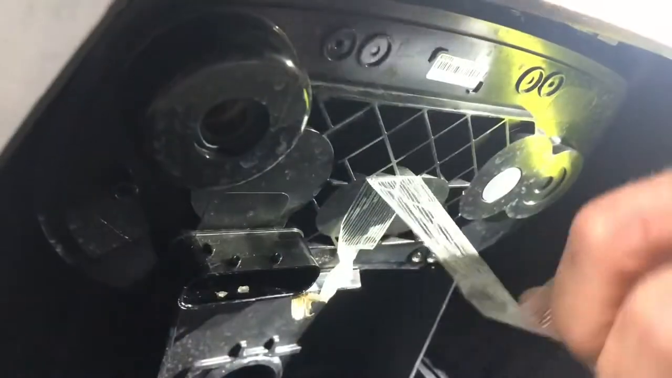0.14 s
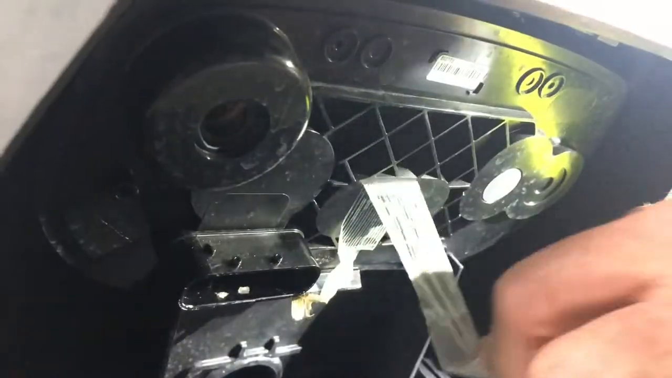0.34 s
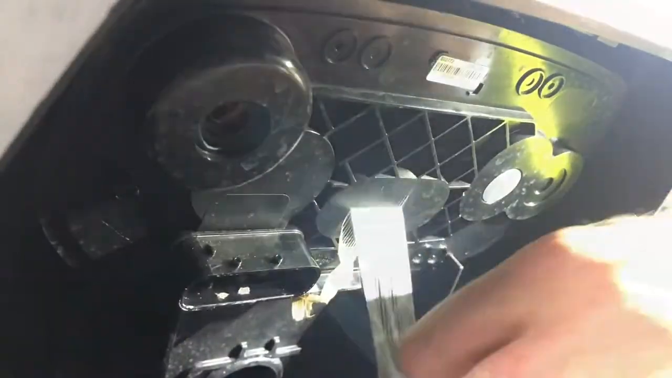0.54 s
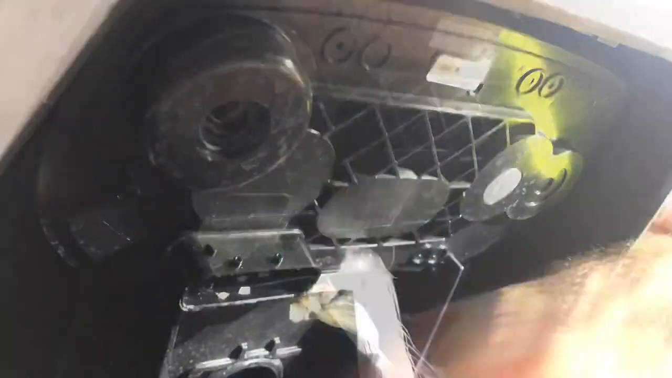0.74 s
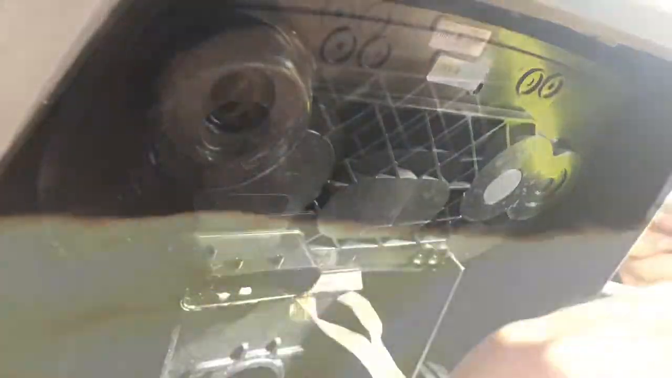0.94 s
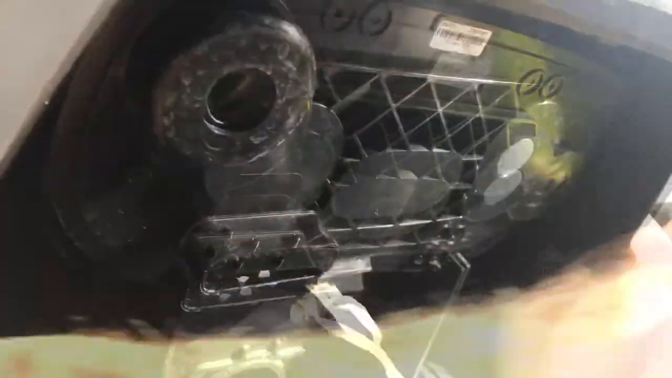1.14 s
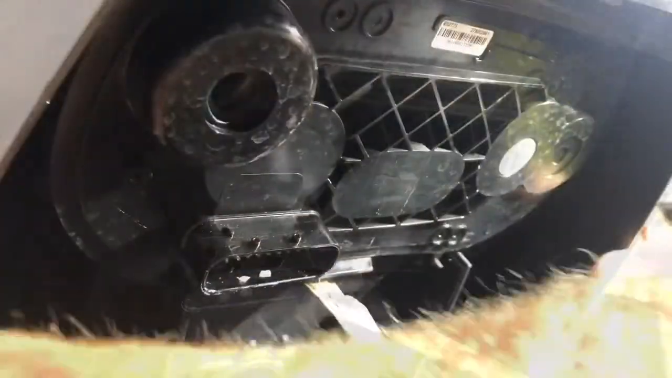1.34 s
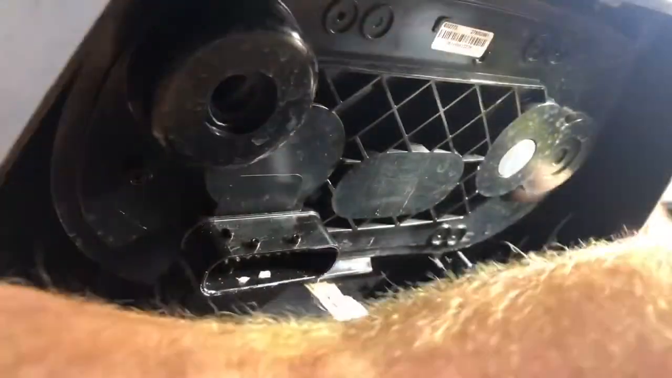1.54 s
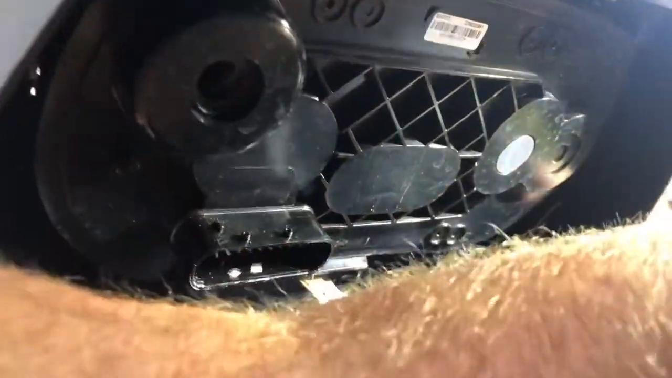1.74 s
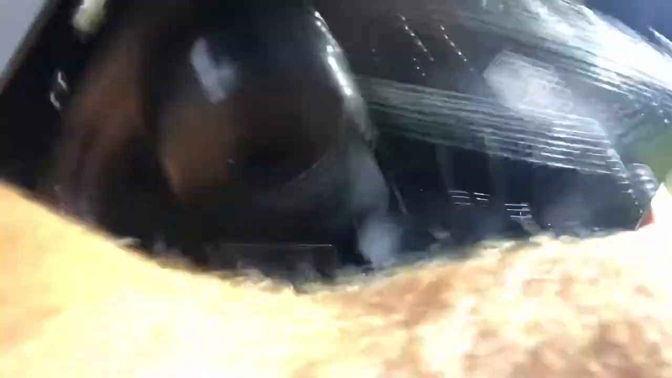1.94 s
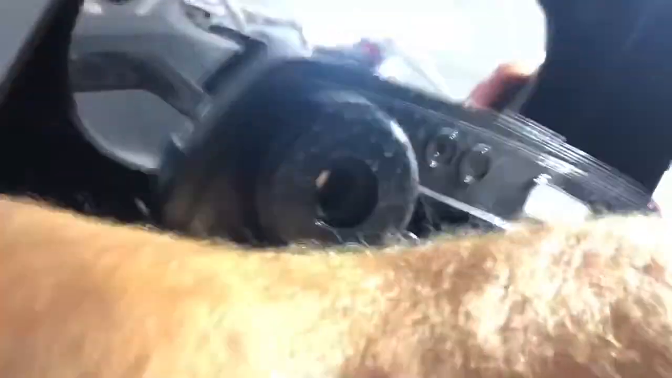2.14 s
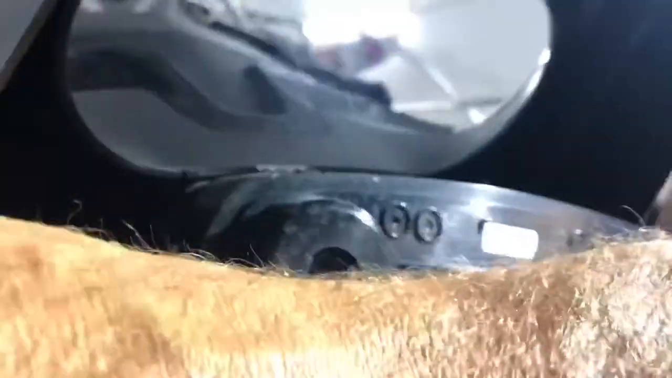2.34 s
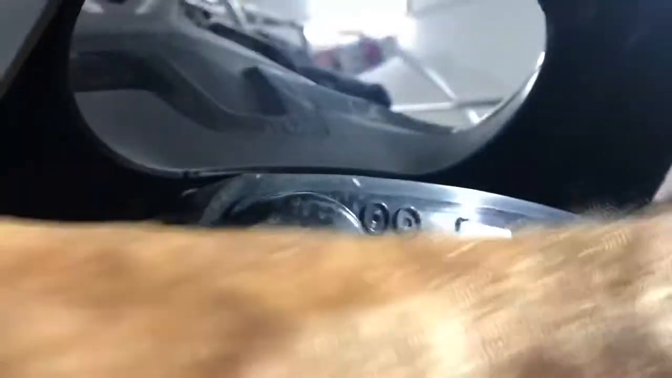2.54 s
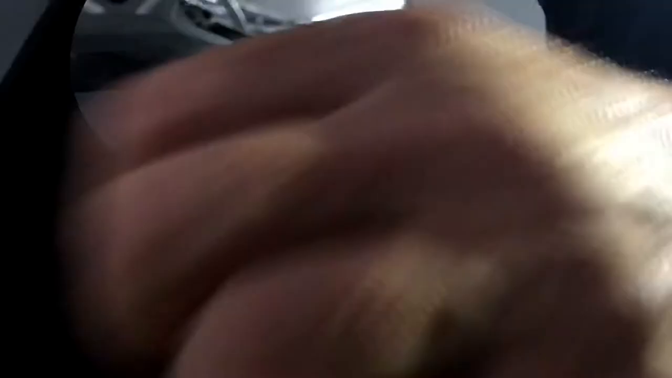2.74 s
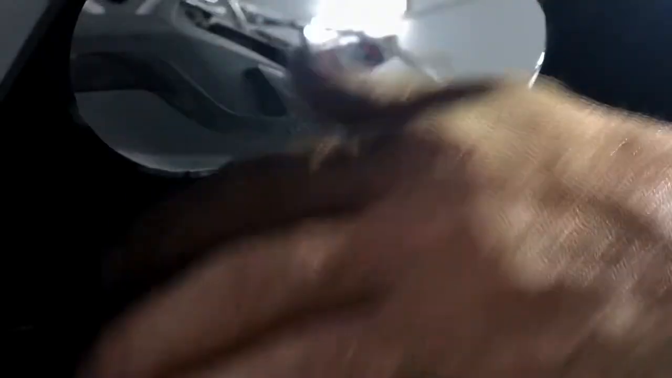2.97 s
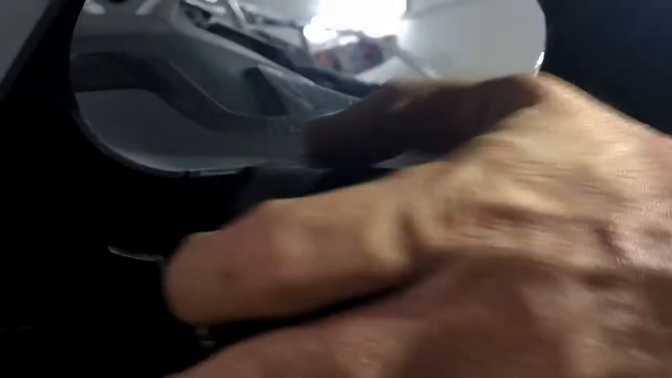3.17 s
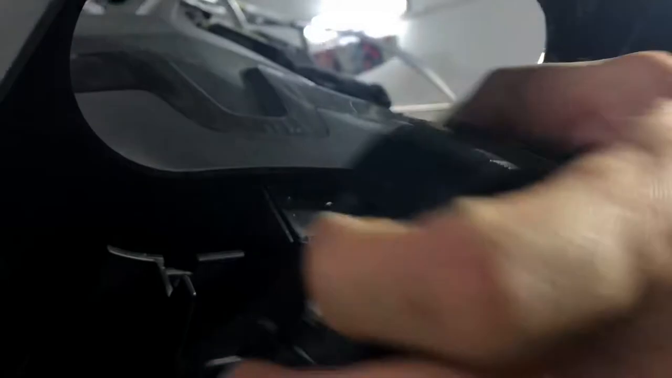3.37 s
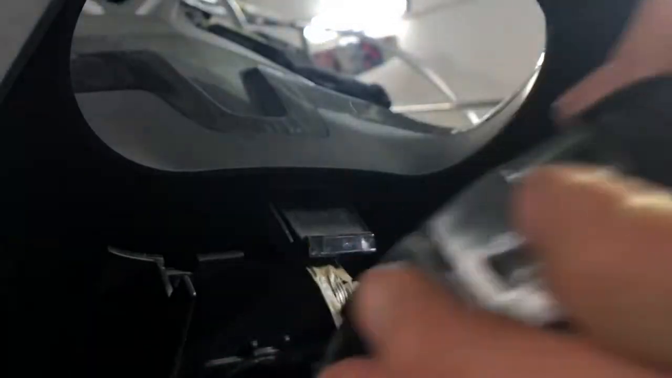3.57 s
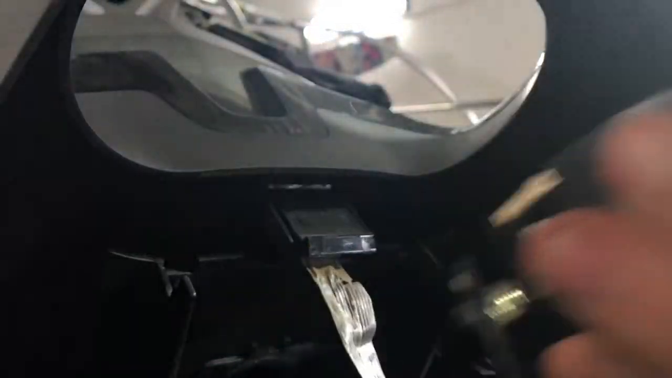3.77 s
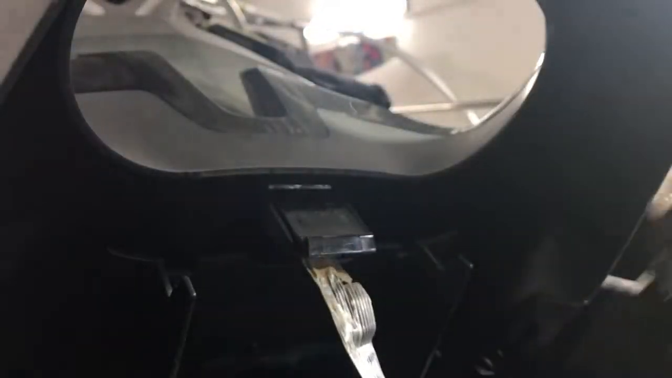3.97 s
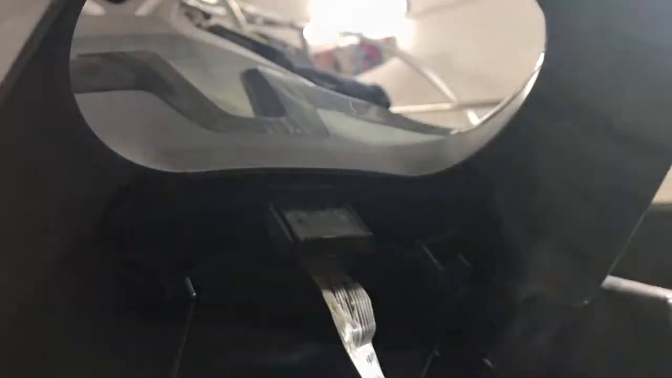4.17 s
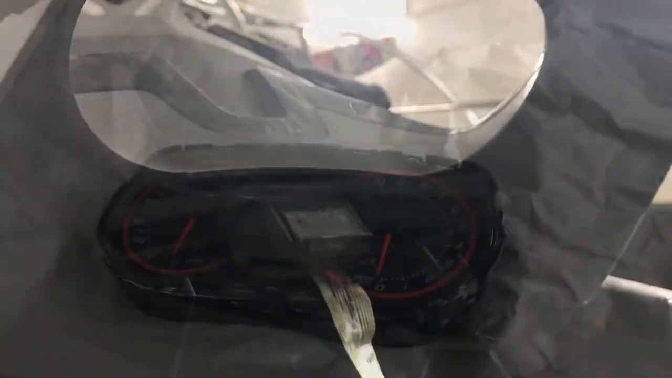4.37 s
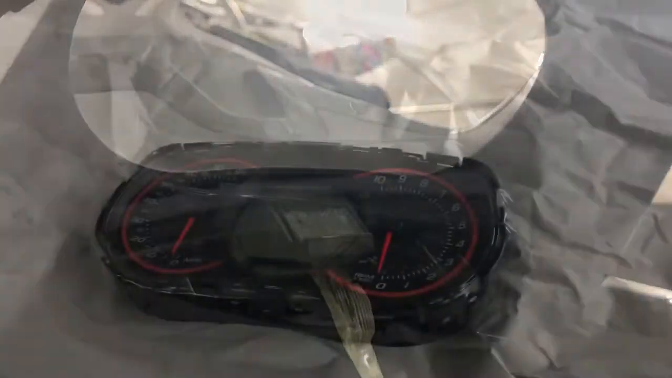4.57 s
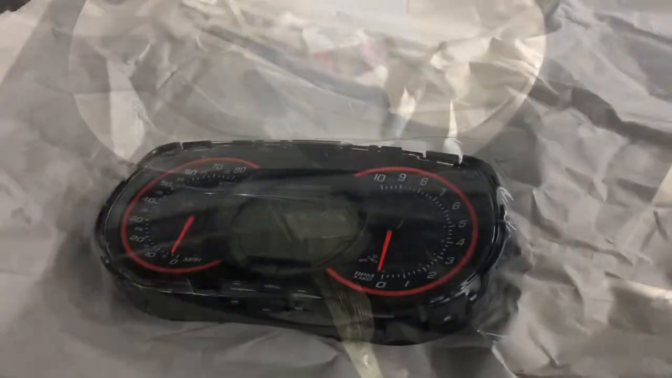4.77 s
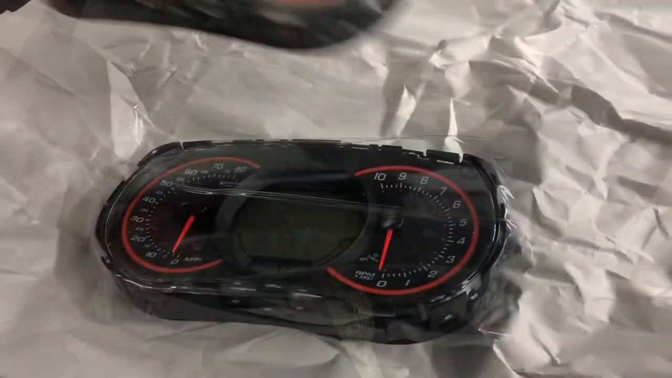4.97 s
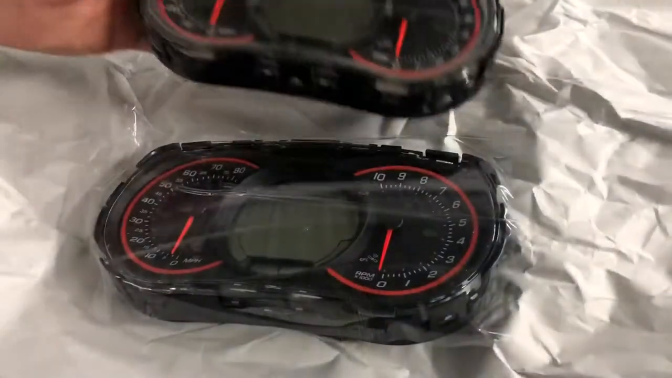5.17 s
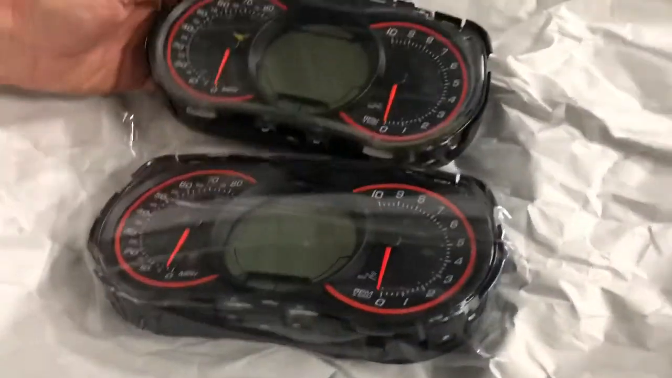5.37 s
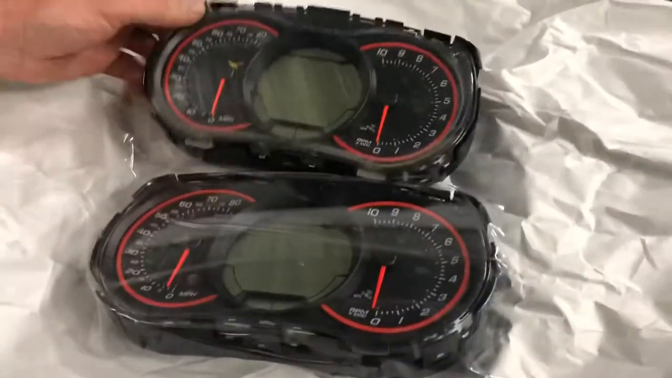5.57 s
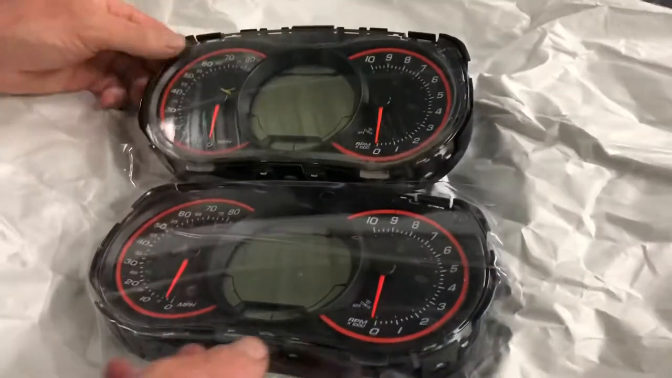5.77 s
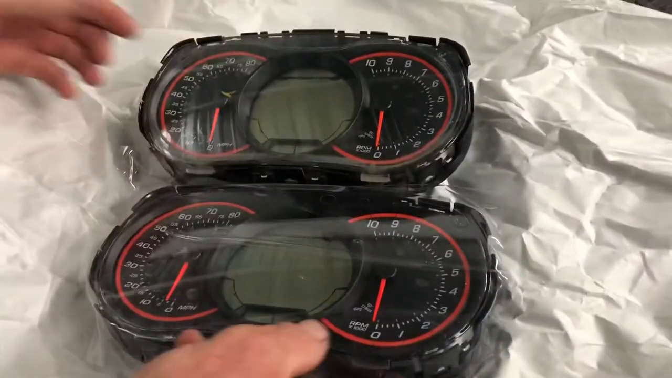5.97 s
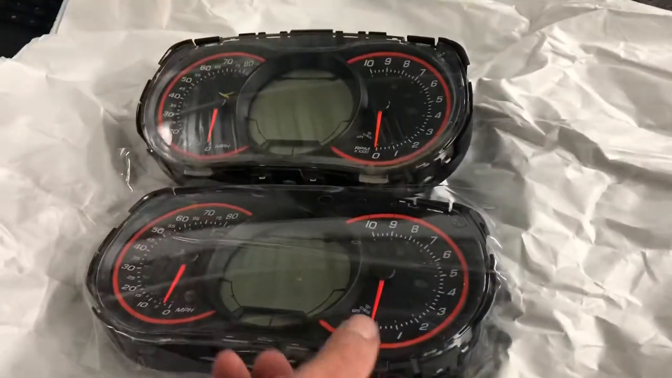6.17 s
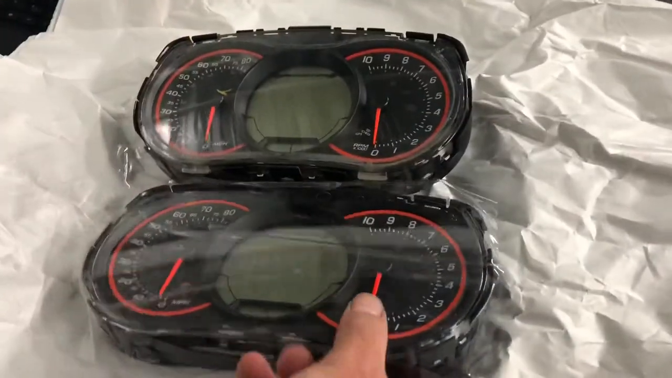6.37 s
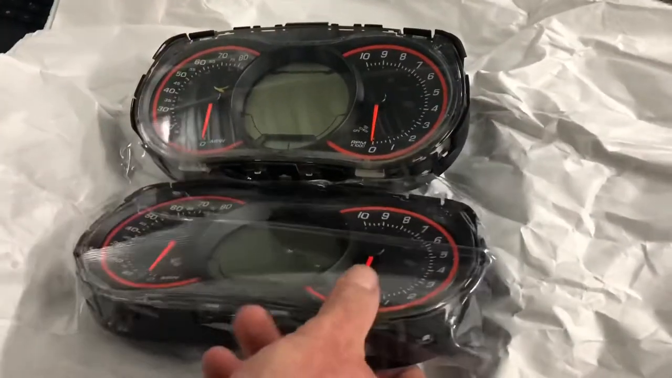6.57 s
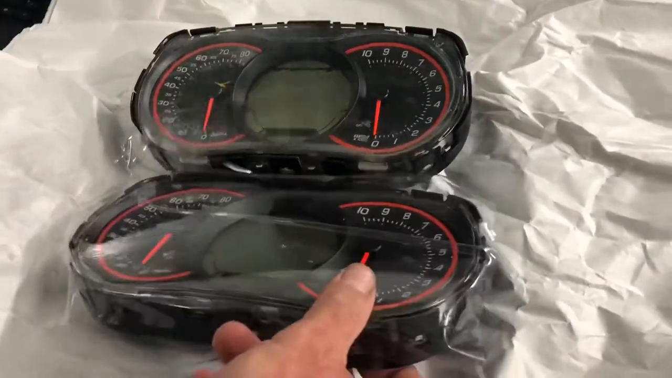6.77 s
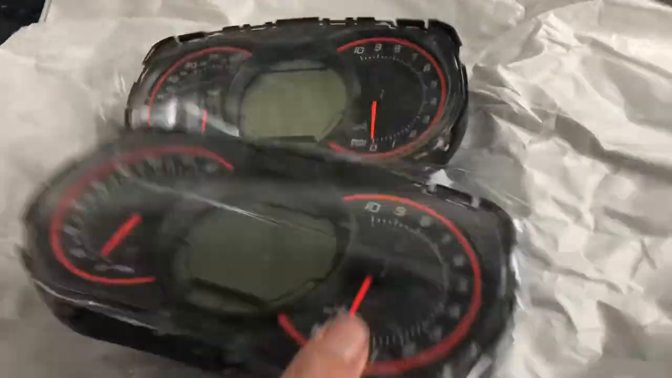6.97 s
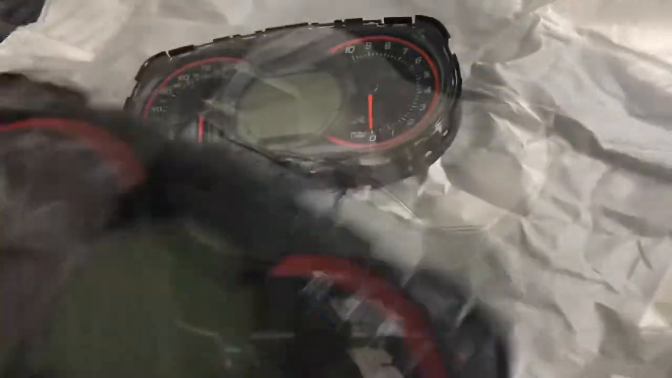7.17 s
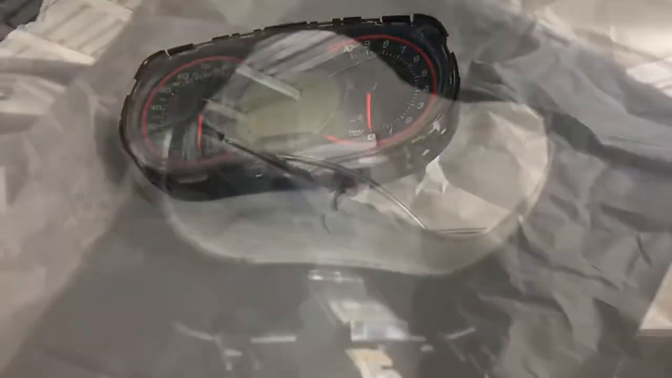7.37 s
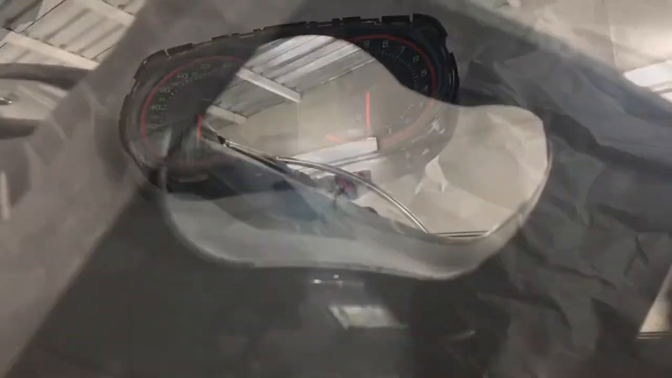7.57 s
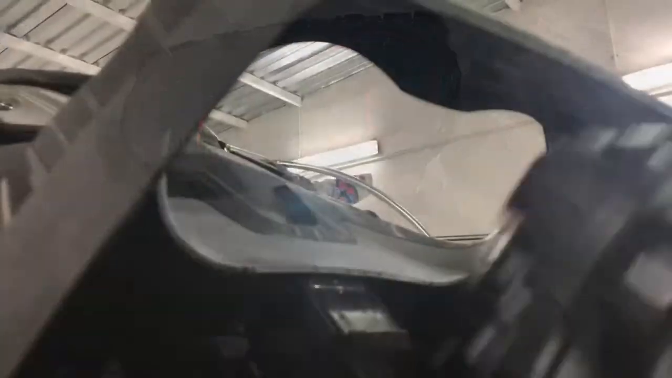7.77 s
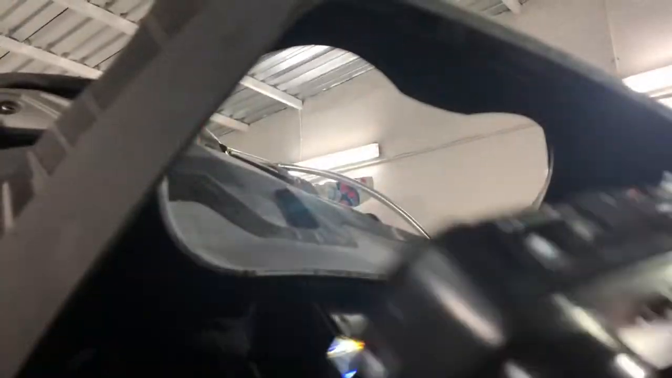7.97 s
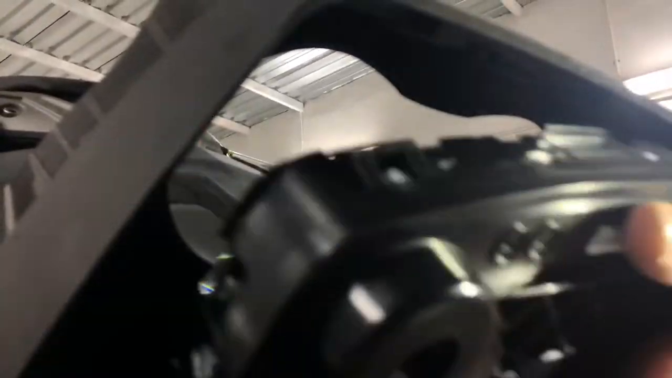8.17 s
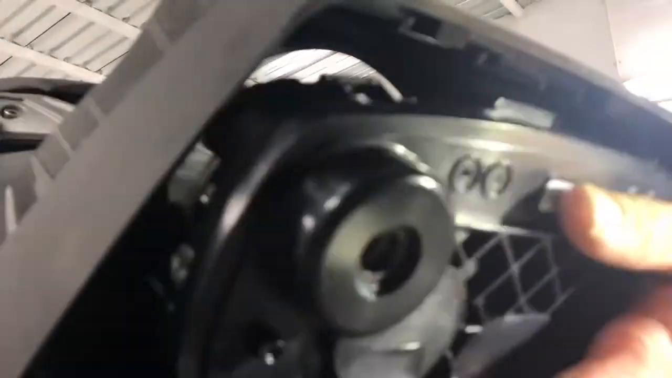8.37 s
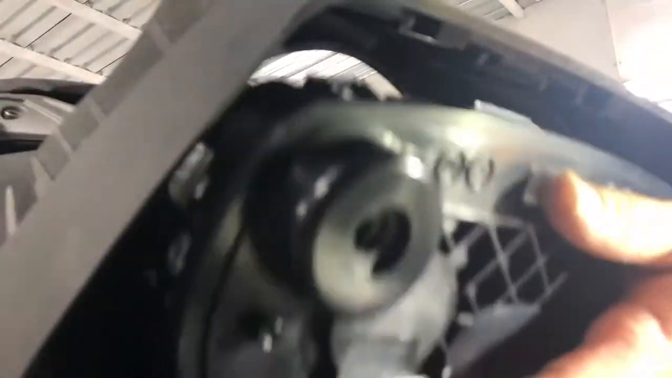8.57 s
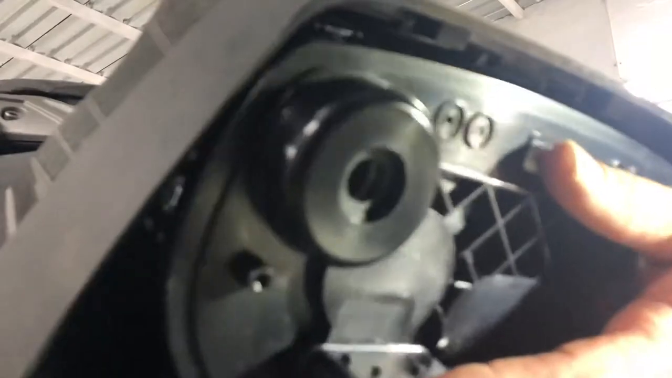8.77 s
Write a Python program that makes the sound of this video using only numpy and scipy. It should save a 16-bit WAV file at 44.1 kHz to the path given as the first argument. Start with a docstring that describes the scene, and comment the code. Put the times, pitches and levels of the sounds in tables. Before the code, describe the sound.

A soft sliding hiss of a wire ribbon and a few light clicks lead into a burst of hard plastic knocks and snaps, the hollow panel thumping and rattling as the gauge housing comes free. Hands rub and scrape the parts, then pause. Paper crinkles in small snaps as a housing is laid down and another lifted, and faint plastic taps finish. The microphone is close, in a still workshop.

```python
"""A ribbon hisses out of its socket, close to a small microphone in a quiet workshop.
Hands work a plastic gauge housing out of a hollow dash panel: knocks and clip snaps ring the housing,
the panel booms and shudders, and sliding contact rubs the same parts. The housing is laid on crumpled
paper, which buckles in small snaps, and another is lifted. Still air and dull reflections lie behind."""
import sys
import numpy as np
from scipy import signal
from scipy.fft import rfft, irfft, next_fast_len
from scipy.io import wavfile
from scipy.ndimage import uniform_filter1d

SR = 44100
rng = np.random.default_rng(int(sys.argv[2]) if len(sys.argv) > 2 else 0)


def pcm_store(signal):
    """Save signal as 16-bit PCM."""
    levels = np.round(np.clip(np.atleast_2d(signal), -1, 1) * 32767)
    wavfile.write(sys.argv[1], SR, levels.astype(np.int16).T)


N = 388962

# The ribbon's pull: time_s, level_db
RIBBON_PULL = [(0, -115), (.07, -49.5), (0.192, -52), (0.214, -36.5), (.26, -74), (0.33, -53),
               (0.433, -33.5), (.5, -51), (.6, -40), (0.691, -49), (0.73, -23.5), (0.751, -69)]
# Hiss of the sliding ribbon: freq_hz, gain_db
RIBBON_SPECTRUM = [(500, -5.5), (2000, -40), (4000, -2.5), (7000, 4), (16000, -4.5)]
# Resonances of its hollow socket: pitch_hz, gain_db
SOCKET_MODES = [(522, -0.5), (834, -0.5), (1600, -4), (2570, -6), (3070, -6.5), (3620, -8.5), (5010, -6.5),
                (6260, -4), (6650, -5.5), (7600, -8), (8580, -5.5), (9810, -5.5)]
# Still workshop air: freq_hz, gain_db
AIR_SPECTRUM = [(18, -51), (30, -16), (90, -2), (394, -12), (1130, -22.5), (16000, -43.5)]
# Hands and parts sliding: time_s, scrape_db, hiss_db
SLIDING = [(0, -56.5, -57), (.7, -55.5, -43), (.86, -57, -61), (1.2, -50, -55), (1.7, -48, -60.5),
           (2.1, -41, -49), (2.35, -63, -92), (2.55, -63, -51.5), (3.047, -56, -71), (3.201, -44.5, -54.5),
           (3.9, -52, -64.5), (4.2, -69, -70.5), (5.228, -71.5, -78), (5.45, -46, -46), (5.9, -50.5, -50),
           (6.18, -59.5, -55), (6.5, -49.5, -53.5), (7.05, -59.5, -59.5), (7.299, -63.5, -68),
           (8, -63.5, -61), (8.349, -66.5, -68), (8.82, -65.5, -68)]
# Scrape of the rubbed housing: freq_hz, gain_db
SCRAPE_SPECTRUM = [(250, -1), (500, 3), (1300, -5.5), (3000, -15.5), (5000, -36)]
# Hiss at the rubbed surface: freq_hz, gain_db
HISS_SPECTRUM = [(1500, -18.5), (3000, 0.5), (5000, 3), (8000, -2), (16000, -5)]
# Modes of the dash panel: pitch_hz, gain_db, t60_s
PANEL_MODES = [(102, 1.5, 0.023), (133, -5, 0.12), (176, -4, 0.14), (201.3, 2.5, 0.14), (271.5, -5.5, 0.19)]
# Blows and clip snaps: start_s, housing_db, panel_db (before the swing limit), tick_db, pitch_hz
KNOCKS = [(0.205, -31, -68, -35, 1080), (0.314, -36.5, -39, -45, 454), (0.729, -20, -36.5, -18, 700),
          (1.047, -23.5, -47, -30, 756), (1.407, -18, -43, -28, 800), (1.585, -22.5, -57, -69.5, 492),
          (1.747, -2.5, -29, -11.5, 730), (1.784, -6, -22, -12.5, 490), (1.864, -12.5, -20, -21, 625),
          (1.929, -8.5, -18, -33, 595), (2.045, 0, 3, -1.5, 567), (2.161, -4, -9, -8, 505),
          (2.222, -9.5, -14, -18.5, 510), (2.264, -20.5, -24, -35, 485), (2.3, -47, -17.5, -21.5, 536),
          (2.366, -14.5, -47, -31.5, 487), (3.142, -10, -20.5, -19.5, 390),
          (5.261, -10.5, -24.5, -33.5, 537), (5.629, -9.5, -31, -27, 970), (7.036, -18, -39, -32, 1030),
          (8.083, -33, -57, -32.5, 547), (8.532, -30, -58, -32.5, 847), (8.699, -35.5, -35.5, -39, 605)]
# Ring time of the housing's packed modes: freq_hz, t60_s
HOUSING_DECAY = [(250, 0.086), (600, 0.034), (1500, 0.06), (4000, 0.0097)]
# Tick of a hard contact: freq_hz, gain_db
TICK_SPECTRUM = [(1500, 0.5), (3000, 0), (5000, -0.5), (8000, -10), (16000, -20)]
# Hollows that answer a blow with one clear note: start_s, peak_db, pitch_hz
HOLLOW_NOTES = [(0.727, -19, 521), (3.143, -11, 318.6), (7.04, -25, 1136), (8.085, -29.5, 562)]
# Brief rubs, and low thumps that follow some blows: start_s, length_s, level_db, centre_hz, width_octaves
SCUFFS = [(0.759, 0.039, -36.5, 201, 0.88), (1.113, 0.067, -39.5, 660, 1.2), (1.615, 0.074, -36, 335, 0.16),
          (1.886, 0.021, -30, 4950, 1.2), (2.514, 0.35, -46.5, 11100, 1.85),
          (3.416, 0.092, -46.5, 6950, 0.69), (3.449, 0.065, -36.5, 480, 0.56),
          (4.009, 0.026, -58, 7530, 0.34), (5.238, 0.068, -45, 2560, 2), (6.211, 0.11, -47.5, 2760, 1.24),
          (6.905, 0.079, -42.5, 1800, 1.3), (7.02, 0.21, -49.5, 96, 0.62), (7.03, 0.26, -56.5, 860, 0.35),
          (7.596, 0.13, -59, 1590, 1.3), (7.754, 0.091, -56, 2586, 0.17), (7.86, 0.13, -69.5, 7260, 0.12),
          (8.111, 0.1, -59, 2580, 1.44), (8.702, 0.19, -42.5, 204, 1.23), (8.723, 0.073, -50.5, 2690, 0.44)]
# Thin clips and creases flicking free: start_s, peak_db, pitch_hz
FLICKS = [(1.258, -35.5, 3500), (1.286, -41, 2480), (1.987, -28, 6340), (2.109, -22, 7600),
          (3.081, -31.5, 3000), (3.252, -20.5, 4340), (3.349, -44.5, 2800), (3.437, -23, 3500),
          (3.569, -32, 3340), (5.683, -14.5, 5400), (7.147, -42.5, 3040), (8.769, -30, 5940)]
# Chattering drags: start_s, length_s, level_db, centre_hz, width_octaves, slips_per_s, drag_ratio
CHATTER = [(3.654, 0.286, -44, 447, 0.51, 205, 0.3), (4.056, 0.11, -55, 1720, 0.98, 575, 0.8)]
# Paper buckling under the housing: start_s, body_db, tick_db, pitch_hz
PAPER_SNAPS = [(5.284, -29, -25, 2500), (5.417, -20.5, -22.5, 1440), (5.502, -29, -26, 2800),
               (5.56, -14.5, -25.5, 1330), (5.604, -45, -24.5, 1220), (5.646, -31, -26, 1500),
               (5.764, -28, -26.5, 1430), (5.778, -28.5, -49, 606), (5.854, -26, -68, 710),
               (5.944, -24.5, -26.5, 1220), (5.979, -26, -23, 776), (5.993, -29, -16.5, 1143),
               (6.038, -25, -32, 1850), (6.059, -19.5, -23, 1290), (6.172, -27, -27, 1340),
               (6.318, -22.5, -66, 1085), (6.47, -27, -22, 1240), (6.485, -20, -23.5, 2960),
               (6.578, -32, -36, 1784), (6.597, -30, -32.5, 1498), (6.656, -27, -42, 1090),
               (6.673, -19.5, -22.5, 1780), (6.72, -26, -34, 2000), (6.823, -21.5, -25.5, 2490),
               (6.845, -35, -26, 1370), (6.943, -37, -26.5, 2200), (7.013, -24, -30.5, 1250)]

PAPER_START_S, PAPER_END_S = PAPER_SNAPS[0][0], PAPER_SNAPS[-1][0]
SWING_LIMIT_DB = -4  # the mounts bound how far the panel swings
RIDGES_DB, RIDGE_COUNT = 4.0, 70  # small hollows in the parts lift some bands and sink others
CONTACT_DRAWS = 2500  # random numbers that give one contact its character


def amp(db):
    return 10 ** (np.asarray(db) / 20)


def unit_rms(x):
    return x / np.sqrt(np.mean(x ** 2) + 1e-20)


def peaked(x, db):
    return amp(db) * x / abs(x).max()


def add(mix, start_s, sound):
    part = mix[round(start_s * SR):][:len(sound)]
    part += sound[:len(part)]


def coloured(x, spectrum):
    """Shapes x by a spectrum of freq_hz, gain_db points."""
    hz, db = np.transpose(spectrum)
    size = next_fast_len(len(x))
    gain_db = np.interp(np.log(np.fft.rfftfreq(size, 1 / SR) + 1), np.log(hz), db)
    return irfft(rfft(x, size) * amp(gain_db), size)[:len(x)]


def ridged(spectrum, ridges=None):
    """A spectrum with ridges laid over it, random unless given."""
    if ridges is None:
        ridges = rng.standard_normal(RIDGE_COUNT)
    hz, db = np.transpose(spectrum)
    grid_hz = np.geomspace(hz[0], hz[-1], len(ridges))
    return np.c_[grid_hz, np.interp(np.log(grid_hz), np.log(hz), db) + RIDGES_DB * ridges]


def ring(modes, tilt_db=0, damping=1, seconds=.5, signs=1):
    """Impulse response of a set of modes, each raised or lowered by tilt_db."""
    hz, db, t60 = np.transpose(modes)[:, :, None]
    t = np.arange(round(seconds * SR)) / SR
    decay = amp(db + np.reshape(tilt_db, (-1, 1)) - 60 * damping * t / t60)
    return (np.reshape(signs, (-1, 1)) * decay * np.sin(2 * np.pi * hz * t)).sum(0)


def grit(per_s, spread_db, drag):
    """Stick-slip force: sparse slips of uneven size over an even drag."""
    sizes = amp(spread_db * np.minimum(rng.exponential(1, N), 5))
    slips = sizes * (rng.random(N) < per_s / SR) * rng.standard_normal(N)
    return unit_rms(slips) + drag * rng.standard_normal(N)


def flicker(seconds, db):
    """Gain that wavers with the pressure of a sliding contact."""
    width = round(seconds * SR)
    drift = uniform_filter1d(uniform_filter1d(rng.standard_normal(N), width), width)
    return amp(db * unit_rms(drift))


def resonate(x, hz, stage_width_hz):
    """Two like resonators in series."""
    radius = np.exp(-np.pi * stage_width_hz / SR)
    for _ in range(2):
        x = 2 * signal.lfilter([1 - radius], [1, -radius * np.exp(2j * np.pi * hz / SR)], x).real
    return x


def wandering(force, spectrum):
    """The ridges change as the contact wanders: four colourings take turns."""
    shares = np.array([flicker(.12, 9) for _ in range(4)])
    tints = np.array([unit_rms(coloured(force, ridged(spectrum))) for _ in shares])
    return unit_rms((shares * tints).sum(0) / np.linalg.norm(shares, axis=0))


def ribbon():
    """Fine friction hiss, part of it coloured by the hollow socket."""
    time_s, db = np.transpose(RIBBON_PULL)
    drag = grit(680, 2.2, 0.93)
    socket = sum(amp(gain_db) * flicker(0.078, 4.0) * unit_rms(resonate(drag, hz, stage_width_hz=190))
                 for hz, gain_db in SOCKET_MODES)
    level = amp(np.interp(np.arange(N) / SR, time_s, db, right=-120)) * flicker(0.012, 0.79)
    hiss = unit_rms(coloured(drag, ridged(RIBBON_SPECTRUM)))
    return level * (hiss + amp(1.0) * unit_rms(socket))


def workshop_air(level_db=-69.5):
    """Room tone: low, steady noise behind the hands."""
    return amp(level_db) * unit_rms(coloured(rng.standard_normal(N), AIR_SPECTRUM))


def rubbing():
    """Friction drives panel, housing and surface hiss; shuddering parts add rattle and small clicks."""
    time_s, *levels = np.transpose(SLIDING)
    t = np.arange(N) / SR
    scrape_level, hiss_level = (amp(np.interp(t, time_s, db)) for db in levels)
    shaking = shudder()
    panel = signal.oaconvolve(grit(130, 2.5, 4.5), ring(PANEL_MODES, damping=1.5))[:N]
    drag = flicker(.03, 1.7) * grit(500, 2.0, 3.0)
    creases = flicker(0.025, 3.2) * grit(700, 2.2, 1.6)  # on paper the friction comes in clumps
    force = np.where((t > PAPER_START_S) & (t < PAPER_END_S), unit_rms(creases), unit_rms(drag))
    rumble = np.hypot(amp(-4.5) * scrape_level, shaking) * unit_rms(panel)
    scrape = np.hypot(scrape_level, amp(-9) * shaking) * wandering(force, SCRAPE_SPECTRUM)
    clatter = amp(-27.5) * shaking * wandering(grit(200, 3.4, 0.66), TICK_SPECTRUM)
    hiss = hiss_level * wandering(force * flicker(0.059, 1.3), HISS_SPECTRUM)
    return rumble + scrape + clatter + hiss


def knock(housing_db, panel_db, tick_db, hz):
    """The housing clacks, and the heavy panel takes several milliseconds to boom."""
    chance, count = rng.standard_normal(CONTACT_DRAWS), len(PANEL_MODES)
    boom = ring(PANEL_MODES, 3.7 * chance[1248:][:count], signs=(-1) ** np.arange(count))
    out = peaked(signal.fftconvolve(boom, np.hanning(150)), min(panel_db, SWING_LIMIT_DB))
    add(out, 0, clack(housing_db, tick_db, hz, chance=chance))
    return out


def clack(body_db, tick_db, hz, damping=1, contact_s=0.001, bright_db=0, chance=None):
    """A brief rattling contact ticks and rings the housing's modes around the struck spot's pitch."""
    if chance is None:
        chance = rng.standard_normal(CONTACT_DRAWS)
    rattle, detune, spot, noise = chance[:1200], chance[1200:1248], chance[1250:1298], chance[1300:]
    mode_hz = np.geomspace(230, 4000, 48) * (1 + .02 * detune)
    t60 = np.exp(np.interp(np.log(mode_hz), *np.log(HOUSING_DECAY).T))
    octaves = np.log2(mode_hz / hz)
    mode_db = -np.where(octaves > 0, 7.0, 11.0) * abs(octaves) - 0.96 * np.maximum(octaves, 0) ** 2
    body = ring(np.c_[mode_hz, mode_db, t60], damping=damping, seconds=0.29, signs=np.sign(spot))
    t = np.arange(len(rattle)) / SR
    contact = t ** 2 * np.exp(-t / contact_s)
    force = contact * rattle
    force[round(2 * contact_s * SR)] += 1.2 * np.linalg.norm(force)  # one firm touch amid the rattle
    out = peaked(signal.fftconvolve(body, force), body_db)
    tail = 0.017 * t ** 2 * np.exp(-t / (3.5 * contact_s))
    ridges = 0.68 * spot[:12] + np.linspace(0, bright_db / RIDGES_DB, 12)
    tick = coloured(noise, ridged(TICK_SPECTRUM, ridges)) * (contact + tail)
    add(out, 0, peaked(tick, tick_db + 3.0))
    return out


def shudder(rise_s=0.04, fall_db_per_s=50.5):
    """Envelope of the shaking that every blow leaves in the loose panel."""
    t, power = np.arange(0, N, 64) / SR, 0
    for start_s, _, panel_db, *_ in KNOCKS:
        since = np.maximum(t - start_s, 0)
        level_db = min(panel_db, SWING_LIMIT_DB) - 15.5 - fall_db_per_s * since
        power += (np.minimum(since / rise_s, 1) * amp(level_db)) ** 2
    return np.interp(np.arange(N) / SR, t, np.sqrt(power))


def reflections(x, per_s=2000, t60_s=0.24):
    """The workshop returns sparse reflections of random sign, dull and quick to die."""
    t = np.arange(SR // 2) / SR
    taps = rng.choice([-1., 1.], len(t)) * (rng.random(len(t)) < per_s / SR)
    taps *= amp(-60 * t / t60_s) * (t > .004)
    taps = coloured(taps, [(100, 1.0), (2000, -9.5), (16000, -17.0)])
    return signal.oaconvolve(x, taps / np.linalg.norm(taps))[:N]


def ping(db, hz, t60_cycles, modes=1, spread_octaves=0):
    """A hollow, clip or crease rings in one or a few close modes after a one-cycle push."""
    scatter = rng.standard_normal(modes)
    mode_hz = hz * 2 ** (spread_octaves * np.clip(scatter, -2, 2))
    note = ring(np.c_[mode_hz, np.zeros(modes), t60_cycles / mode_hz], seconds=.2, signs=np.sign(scatter))
    period = round(SR / hz)
    push = np.hanning(period + 3)[1:-1] * np.sin(2 * np.pi * hz * np.arange(period + 1) / SR)
    return peaked(signal.fftconvolve(note, push), db)


def stroke(force, db, hz, octaves, taper, ridge_depth=1):
    """A stroke's force heard through one ridged resonance."""
    steps = np.linspace(-4, 4, 17)
    resonance = np.c_[hz * 2 ** (octaves * steps), -6 * steps ** 2]
    spectrum = ridged(resonance, ridge_depth * rng.standard_normal(RIDGE_COUNT))
    sound = coloured(np.pad(force, (0, 2000)), spectrum)[:len(force)]
    return amp(db) * unit_rms(sound) * signal.windows.tukey(len(force), taper)


def scuffs_and_chatter():
    """Scuffs draw on gritty drag, chatter on nearly regular slips."""
    out = np.zeros(N)
    drag = grit(700, 2.0, 1.9) * flicker(0.0078, 0.57)
    jitter, roughness = flicker(0.011, 0.59), rng.standard_normal(N)
    for start_s, length_s, *tone in SCUFFS:
        force = drag[round(start_s * SR):][:round(length_s * SR)]
        add(out, start_s, stroke(force, *tone, taper=0.62))
    for start_s, length_s, *tone, per_s, drag_ratio in CHATTER:
        span = slice(round(start_s * SR), round((start_s + length_s) * SR))
        noise = roughness[span][1:]
        slips = np.diff(np.floor(np.cumsum(per_s * jitter[span]) / SR)) * amp(2.0 * noise)
        force = unit_rms(slips) + drag_ratio * noise
        add(out, start_s, stroke(force, *tone, taper=0.25, ridge_depth=0.72))
    return out


def paper():
    """Paper buckles under the housing in bright, damped snaps, with small creases in between."""
    out = np.zeros(N)
    for start_s, *snap in PAPER_SNAPS:
        add(out, start_s, clack(*snap, damping=1.9, contact_s=0.000512, bright_db=13.0))
    for when, size, pitch in rng.random((45, 3)):
        crease = clack(-42 + 11 * size, -48 + 11 * size, 700 * 5 ** pitch, damping=1.3, contact_s=0.000415)
        add(out, PAPER_START_S + when * (PAPER_END_S - PAPER_START_S), crease)
    return out


def scene():
    """Close perspective: dry friction and room tone, with faint reflections on the impacts."""
    hits = np.zeros(N)
    for start_s, *blow in KNOCKS:
        add(hits, start_s, knock(*blow))
    hits += paper()
    for start_s, *flick in FLICKS:
        add(hits, start_s, ping(*flick, t60_cycles=20, modes=6, spread_octaves=0.3))
    for start_s, *note in HOLLOW_NOTES:
        add(hits, start_s, ping(*note, t60_cycles=42.5))
    room = workshop_air() + amp(-13.5) * reflections(hits)
    return (hits + room + rubbing() + ribbon() + scuffs_and_chatter())[None]


def record(dry, low_cut_hz=62, top_hz=16000, knee=.7):
    """The small microphone drops the deep bass, rounds off the loudest blows and cuts the top treble."""
    thin = signal.sosfilt(signal.butter(3, low_cut_hz, "high", fs=SR, output="sos"), dry)
    rounded = np.sign(thin) * (knee + .25 * np.tanh((abs(thin) - knee) / .25))
    soft = np.where(abs(thin) < knee, thin, rounded)
    return signal.oaconvolve(soft, signal.firwin(511, top_hz, window=("kaiser", 9), fs=SR)[None], "same")


dry = scene()
out = record(dry)
pcm_store(out)
```